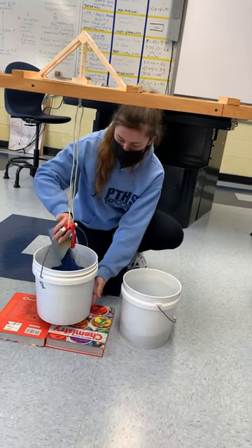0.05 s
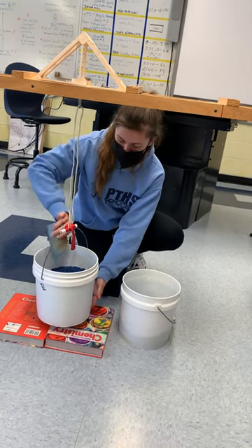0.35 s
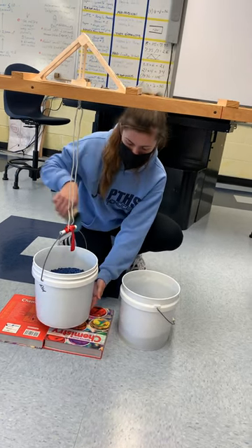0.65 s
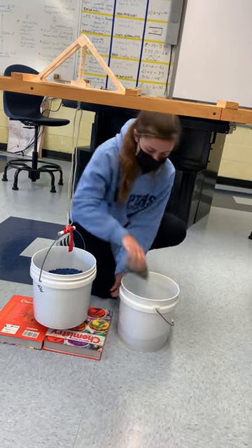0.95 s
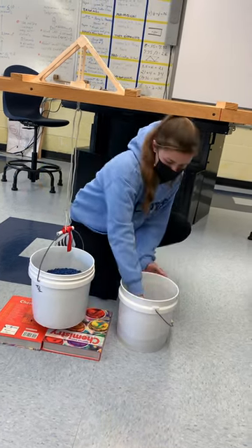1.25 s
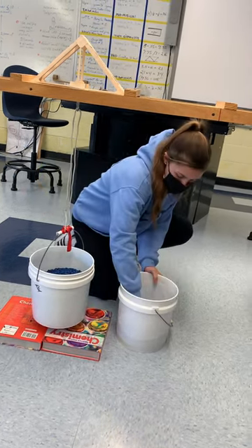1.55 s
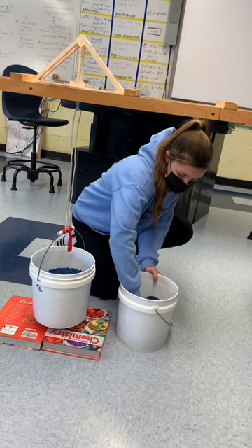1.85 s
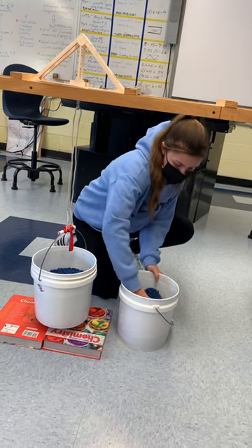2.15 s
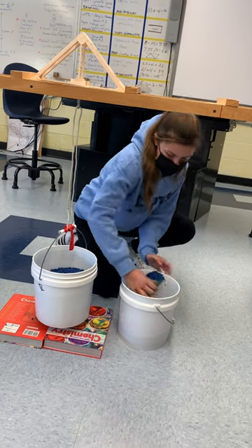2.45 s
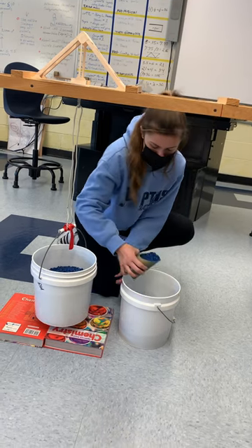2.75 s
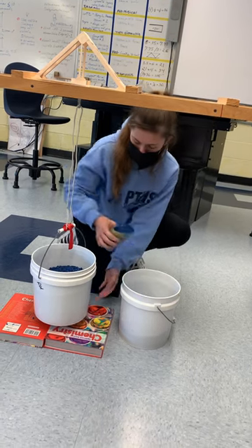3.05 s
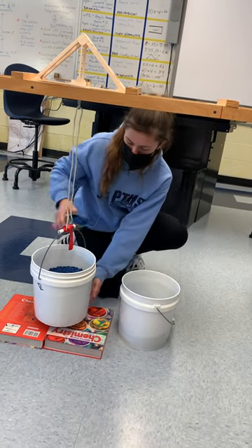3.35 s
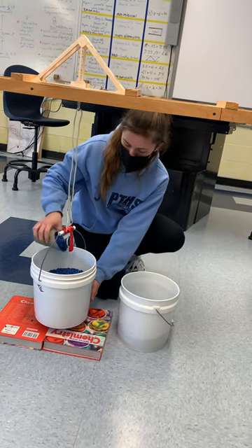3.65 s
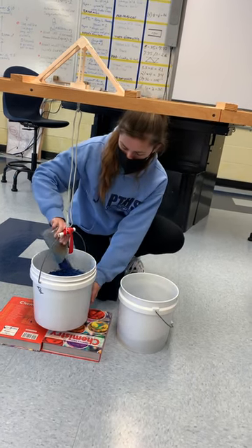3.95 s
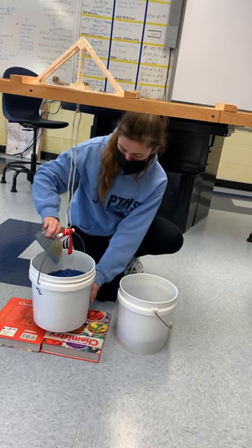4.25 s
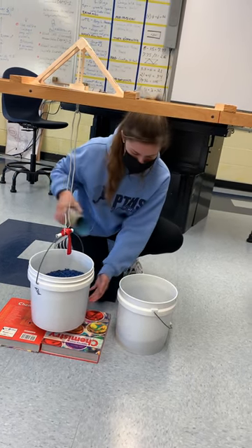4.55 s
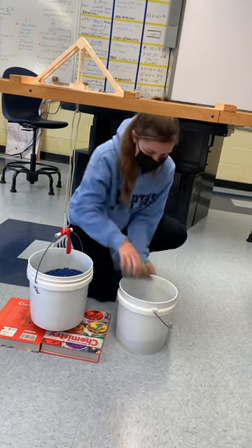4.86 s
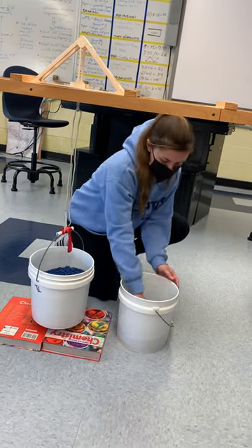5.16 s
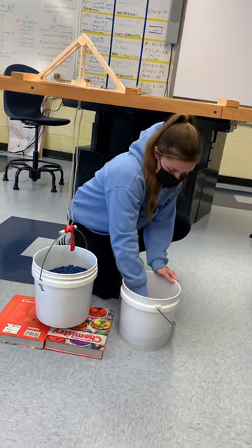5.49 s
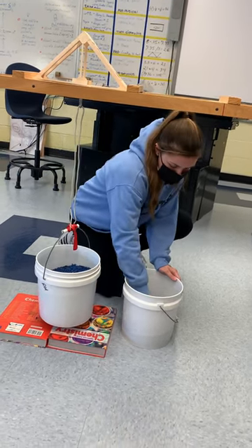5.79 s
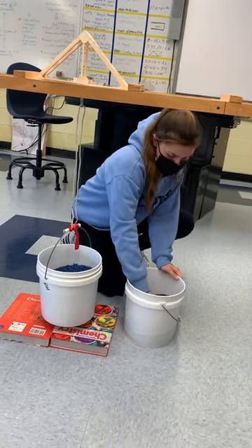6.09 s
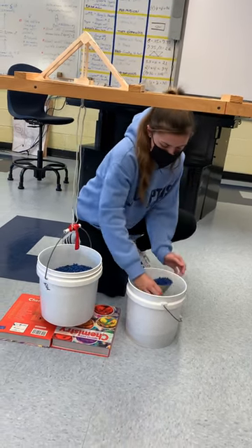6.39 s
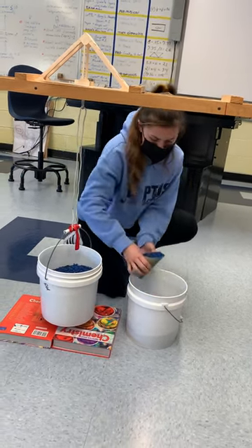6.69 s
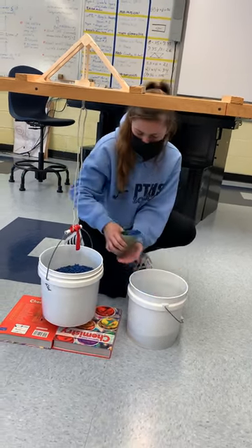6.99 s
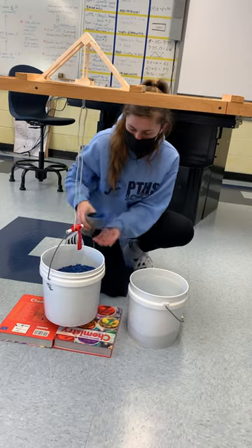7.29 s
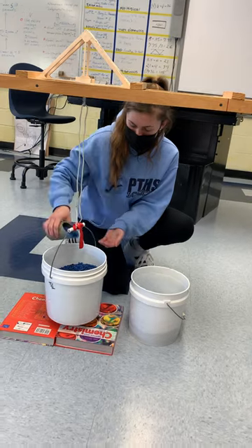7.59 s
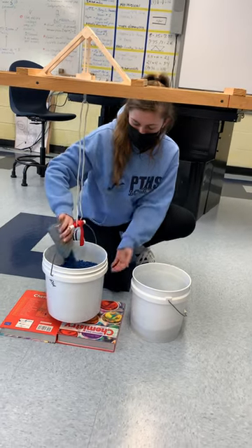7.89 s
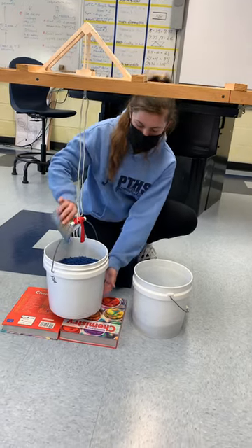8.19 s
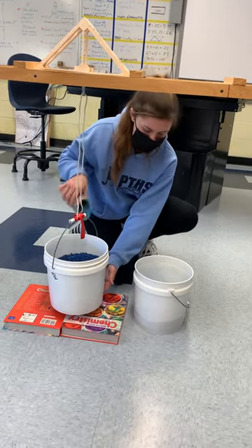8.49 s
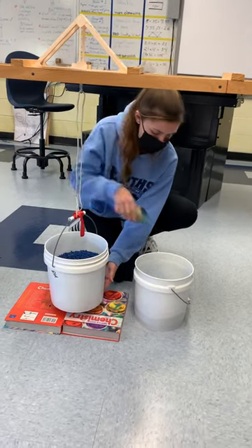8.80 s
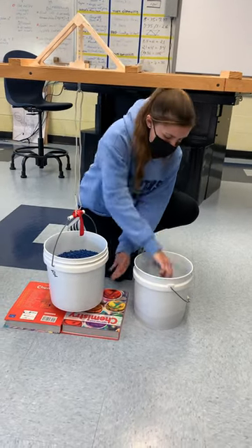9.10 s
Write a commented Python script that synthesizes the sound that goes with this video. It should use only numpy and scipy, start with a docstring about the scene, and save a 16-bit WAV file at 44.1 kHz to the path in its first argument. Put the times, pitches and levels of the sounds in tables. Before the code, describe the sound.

In a classroom with softly rumbling ventilation, a cup moves small plastic pellets from one plastic bucket to another, a couple of metres from the microphone. Three short rattling pours come about four seconds apart, the first right at the start. Between them the cup crunches into the pellets, judders against the hollow bucket wall and gives a few sharp taps as loose pellets drop. The room adds a short echo.

```python
"""Scooping and pouring plastic pellets

In a classroom, a cup moves pellets from one plastic bucket to another. It digs in with a crunch that
drums the bucket floor, judders along the wall, drops a few strays, then empties in a rattling rush
of tiny collisions. Ventilation rumbles underneath."""
import sys
import numpy as np
from scipy import signal
from scipy.fft import rfft, irfft, next_fast_len
from scipy.io import wavfile
from scipy.ndimage import uniform_filter1d

SR = 44100
rng = np.random.default_rng(int(sys.argv[2]) if len(sys.argv) > 2 else 0)


def master_out(mix):
    """Clip the mix to full scale and print it as 16-bit PCM to the path in sys.argv[1]."""
    frames = np.transpose(np.atleast_2d(mix))
    ceiling = np.clip(frames, -1, 1)
    pcm = np.round(ceiling * 32767).astype(np.int16)
    wavfile.write(sys.argv[1], SR, pcm)


N = 407484
TIME = np.arange(N) / SR

# Levels in the tables are relative: each sound gets its overall volume later.
# Cupfuls drop on the heap, whose air space shrinks each time.
# Each row: start, rise and hold in seconds, level and treble in dB, lowest rattle in Hz.
POURS = [(-0.1, .12, .19, -36, -36, 1060), (3.855, 0.095, 0.053, -30.5, -30, 1100),
         (7.847, 0.15, 0.11, -35.5, -36, 1480)]
# Pellets stuck together land as one. Each row: start in seconds, level in dB.
CLUMPS = [(.006, -38), (0.077, -33), (.12, -34), (0.169, -32.5), (0.212, -33.5), (.325, -46.5),
          (3.905, -38), (3.951, -31.5), (4.059, -34), (4.119, -41), (7.915, -43.5), (7.975, -40.5),
          (8.015, -36.5), (8.071, -32), (8.102, -33.5)]
# The cup digs in; the last row is the cup set down on the floor. Each row: start, rise and hold in seconds,
# crunch, treble and floor drumming in dB.
SHOVES = [(1.141, 0.0097, 0.045, -54, -55.5, -48.5), (1.164, 0.063, 0.035, -45.5, -46.5, -44),
          (1.315, 0.065, 0.058, -44, -49, -41.5), (1.49, .03, 0.24, -59.5, -75, -51.5),
          (1.599, 0.12, 0.007, -36, -40.5, -45.5), (5.073, 0.013, 0.053, -56, -55.5, -50.5),
          (5.159, 0.055, 0.034, -51.5, -56, -53.5), (5.227, 0.11, 0.13, -50.5, -53.5, -45.5),
          (5.458, 0.054, 0.17, -51.5, -56.5, -52), (5.643, 0.084, 0.018, -43.5, -46, -56),
          (9.223, 0.0086, .03, -52.5, -74, -48)]
# The cup sweeps up the wall. Each row: start, rise and hold in seconds, crunch, treble and drag in dB.
SWEEPS = [(1.645, 0.26, 0.32, -39.5, -45, -36.5), (5.706, .29, .19, -37.5, -43, -35)]
# Loose pellets shift or spill. Each row: start and length in seconds, crunch and treble in dB.
SHIFTS = [(2.366, 0.026, -43.5, -48), (2.48, 0.0067, -50.5, -60), (2.532, 0.015, -58, -66),
          (2.595, 0.073, -61.5, -68), (2.702, 0.0117, -55.5, -59), (3.316, .04, -72, -84),
          (3.364, 0.074, -62.5, -74.5), (3.568, .03, -72, -61), (4.946, 0.0095, -61.5, -79),
          (6.285, 0.013, -42.5, -47), (6.447, 0.043, -52.5, -59), (6.51, 0.12, -60.5, -66),
          (6.68, 0.093, -72.5, -67.5), (6.776, 0.16, -67, -82.5), (7.141, 0.04, -71, -78),
          (7.244, 0.081, -65, -70.5), (7.318, .17, -68.5, -76)]
# The cup sticks and slips on the wall. Each row: start in seconds, level in dB.
SLIPS = [(1.843, -29), (1.888, -25.5), (1.93, -29), (1.95, -26.5), (2.005, -37.5), (2.062, -34),
         (5.897, -35), (5.945, -24), (5.95, -24), (5.957, -24), (5.999, -24), (6.029, -23.5), (6.053, -37),
         (6.115, -25)]
# Cup taps and lone pellets. Each row: start in seconds, level, brightness and hollow ring in dB.
TAPS = [(0.342, -25, 3, -70), (1.1526, -63, -18, -47), (1.729, -19.5, -15.5, -62),
        (2.3564, -27, -22.5, -60), (2.3978, -21.5, -12, -57), (2.4314, -37, -22, -43), (2.5, -35, -5, -62),
        (2.539, -39, -27, -40.5), (2.564, -31.5, -21, -45), (2.71, -33.5, -12, -68),
        (2.994, -45.5, -36.5, -65), (3.031, -51.5, -19, -77), (3.3755, -38, -36, -46.5),
        (3.404, -37.5, -19, -60.5), (3.4491, -11.5, -1, -68), (3.5577, -32, 7, -75),
        (3.5903, -17.5, -8.5, -46.5), (3.609, -28.5, -15, -65), (3.736, -34.5, -8.5, -49),
        (3.8924, -14, -7, -60), (4.1235, -24.5, -45, -66), (4.229, -31, -27.5, -63), (5.086, -45, -7, -62),
        (6.2915, -25.5, -14, -62), (6.3011, -23, 0.5, -70), (6.348, -24, -18, -62), (6.44, -32, -15, -63),
        (6.4555, -30.5, -25, -44), (6.542, -33.5, -19, -43.5), (6.6883, -39, 3, -53),
        (6.7325, -39, -18, -51), (6.9645, -46, -42, -49), (7.1694, -44.5, -26, -55),
        (7.2668, -35.5, -13, -48.5), (8.2248, -35, -14, -71), (8.2691, -33, -3, -72),
        (8.429, -46, -17, -68.5), (9.229, -47, -32, -64)]
# The tone of pouring, scooping, taps and moving air. Each row: frequency in Hz, level in dB.
POUR_COLOUR = [(250, -15.5), (450, -21.5), (700, -23), (1000, -8.5), (1400, -2), (2000, -2.5), (3100, 0),
               (4400, -7), (5600, -12), (7500, -8), (10500, -7), (15000, -12.5)]
SCOOP_COLOUR = [(250, -10.5), (500, -10.5), (800, 2.5), (1300, 0.5), (1800, 6), (3000, 1.5), (4400, -1.5),
                (6500, -7.5), (8300, -4), (11000, -7.5), (15000, -11.5)]
TAP_COLOUR = [(300, -41), (800, -22.5), (1800, -3), (3300, -4), (5000, -11), (7500, -4), (10500, -0.5),
              (15000, -7.5)]
VENT_COLOUR = [(24, -46.5), (35, -16), (55, 0.5), (90, -4), (140, -0.5), (240, -4), (420, -16),
               (950, -22.5), (1500, -30.5), (3000, -40), (6500, -46.5), (11000, -40), (15000, -47.5)]
# Modes are the pitches at which a thing rings: the air above the heap, the cup, a bucket's floor
# and its wall. Each row: pitch in Hz, width in Hz (wider dies sooner), level in dB.
AIR_MODES = [(1350, 140, -3.5), (1970, 140, 2), (2330, 260, -4.5), (2510, 80, -5), (3060, 80, -6.5),
             (3332, 70, -6), (4100, 130, -5.5)]
CUP_MODES = [(554, 40, -12.5), (670, 65, -1.5), (792, 80, -3.5)]
FLOOR_MODES = [(320, 76, 20), (385, 35, -7)]
WALL_MODES = [(750, 96, -11), (837, 97, 6.5), (1002, 51, -2), (1160, 70, -8.5)]
# Mains hum and fan tone. Each row: pitch in Hz, level in dB.
VENT_TONES = [(120, -66.5), (595, -79.5)]
# The room's echo. Each row: frequency in Hz, seconds to fade by 60 dB.
ROOM_DECAY = [(200, 0.6), (2000, 0.42), (6000, 0.42), (14000, 0.44)]
# Stereo width. Each row: frequency in Hz, level of the side signal against the middle in dB.
STEREO_WIDTH = [(100, -14), (550, 2), (1000, -1.5), (2000, -1), (4500, 4.5), (7000, -0.5), (9000, -13),
                (15000, -8.5)]
# The left microphone against the right. Each row: frequency in Hz, level in dB.
LEFT_BALANCE = [(150, -2.0), (2000, 0.0), (5300, -3.0), (8000, -0.2)]
# How far the left microphone trails. Each row: frequency in Hz, phase lag in radians.
LEFT_LAG = [(0, 0), (1500, .5), (4000, 0), (6200, .1), (16000, 4 * np.pi)]


def pouring():
    """A trickle, then a cupful in clumps: the collisions rattle and also shake cup and bucket floor."""
    starts, _, _, levels_db, trebles_db, lowest_hz = np.transpose(POURS)
    # each stream thins out, then dies faster as the cup runs empty
    streams = [stroke(s, rise, hold, fall_db_per_s=114) * fade(s + rise + hold + 0.15, db_per_s=190)
               for s, rise, hold, *_ in POURS]
    trickle = sum(swell(s - 0.044, rise_db_per_s=380.5, fall_db_per_s=0) * fade(s, 114) for s in starts)
    clump_shapes = [stroke(s, rise_s=0.0066, hold_s=.008, fall_db_per_s=349.5) for s, _ in CLUMPS]
    clumps = together(clump_shapes, [db for _, db in CLUMPS])
    landing = together(streams + [trickle, clumps], [*levels_db, -51, 0])
    flow = together(streams + [trickle, clumps], [*trebles_db, -45, -5])
    hits_per_s = 500 + 3500 * (flow / flow.max()) ** .75
    clicks = collisions(hits_per_s, spread_db=1.5, even_s=0.0099, clump_db=1.6, clump_s=.007)
    # rolling in the tipped cup is loudest soon after the drop begins
    rolling = sum(swell(s + .07, rise_db_per_s=86, fall_db_per_s=71) for s in starts)
    cup = hollow_ring(CUP_MODES, keep_hz=(420, 1000), level_hz=(500, 900))
    hollow = from_db(-48.5) * convolve(clicks * rolling, cup)
    thud = from_db(-31.5) * convolve(clicks * landing, bucket_floor())
    grains = pellets(clicks, ring_s=0.0011, scatter_db=-9.5, ping_db=-5.5, ping_s=0.028)
    # each cupful has less low rattle than the one before
    cupful = np.searchsorted((starts[:-1] + starts[1:]) / 2, TIME)
    grains = sum(cut(grains * (cupful == k) + 1e-18, hz, "high", order=3)
                 for k, hz in enumerate(lowest_hz))
    click = impact(POUR_COLOUR)
    click_in_bucket = click + from_db(2.0) * resonate(click, AIR_MODES)
    return hollow + thud + from_db(-1.5) * rattle(grains, landing, flow, click_in_bucket)


def scooping():
    """Pellets grind past each other as the cup digs in, sweeps up and is carried off."""
    moves = shoves() + [stroke(s, rise, hold, fall_db_per_s=82) for s, rise, hold, *_ in SWEEPS]
    moves += [stroke(s, rise_s=0.004, hold_s=length, fall_db_per_s=250) for s, length, *_ in SHIFTS]
    levels = [row[3:5] for row in [*SHOVES, *SWEEPS]] + [row[2:] for row in SHIFTS]
    crunch_db, treble_db = np.transpose(levels)
    speed, surface = together(moves, crunch_db), together(moves, treble_db)
    hits_per_s = 280 + 2600 * (speed / speed.max()) ** .7
    clicks = collisions(hits_per_s, spread_db=2.0, even_s=0.021, clump_db=1.1, clump_s=0.0091)
    grains = pellets(clicks, ring_s=.0025, scatter_db=-8, ping_db=-4.5, ping_s=0.038)
    return from_db(-2.0) * rattle(grains, speed, surface, impact(SCOOP_COLOUR))


def shoves():
    """How each push of the cup into the pellets, and its final set-down, grows and fades."""
    return [stroke(s, rise, hold, fall_db_per_s=139) for s, rise, hold, *_ in SHOVES]


def supply_bucket():
    """Uneven shoves drum the bucket floor; the cup sticks and slips on the wall; taps ring hollow."""
    wall = hollow_ring(WALL_MODES, keep_hz=(620, 1300), level_hz=(700, 1100))
    # the drag peaks as the sweep reaches full speed
    drags = [swell(s + rise, rise_db_per_s=111.5, fall_db_per_s=90) for s, rise, *_ in SWEEPS]
    drag = together(drags, [row[-1] for row in SWEEPS])
    dig = together(shoves(), [row[-1] for row in SHOVES])
    # floor and wall are one shell: each shakes the other
    on_floor, on_wall = together([dig, drag], [0, -20.5]), together([drag, dig], [0, -0.5])
    floor_hits = collisions(200, spread_db=0.5, even_s=0.054, clump_db=1.5, clump_s=0.011)
    wall_hits = collisions(260, spread_db=1.5, even_s=0.022, clump_db=3.5, clump_s=0.02)
    drumming = from_db(0.2) * convolve(floor_hits * on_floor, bucket_floor())
    dragging = from_db(-5) * convolve(wall_hits * on_wall, wall)
    knocks = np.zeros(N)
    for s, *_, db in [*SLIPS, *TAPS]:
        knocks[int(s * SR)] = from_db(db)
    return drumming + dragging + from_db(1.5) * convolve(knocks, wall / np.abs(wall).max())


def strays_and_taps():
    """Lone pellets and cup taps: a bright crack over a lower plastic ring."""
    out, click, t = np.zeros(2 * N), impact(TAP_COLOUR), TIME[:2048]
    bodies = contacts(len(TAPS), ring_s=0.024, scatter_db=-14.0, scatter_s=0.075, size=len(t))
    cracks = contacts(len(TAPS), ring_s=0.0031, scatter_db=-9.0, scatter_s=0.064, size=len(t))
    for (s, db, bright_db, _), body, crack in zip(TAPS, bodies, cracks):
        rise_s = 0.00055 * from_db(-bright_db / 2)  # a duller touch starts more softly
        body = unit_energy(body * (1 - np.exp(-t / rise_s)))
        low = cut(body, 6500, "low", order=3)
        high = from_db(bright_db + 11.0) * cut(crack, 6300, "high", order=3)
        tap, at = convolve(low + high, click), int(s * SR)
        out[at:at + len(tap)] += from_db(db + 14.0) * unit_energy(tap)
    return out[:N]


def collisions(per_s, spread_db, even_s, clump_db, clump_s):
    """Random clicks of unequal size, evened out in loudness, then bunched into small avalanches."""
    sizes = from_db(spread_db * np.minimum(rng.exponential(1, N), 4)) * rng.choice([-1, 1], N)
    clicks = sizes * (rng.random(N) < per_s / SR)
    window = int(even_s * SR)
    power = uniform_filter1d(uniform_filter1d(clicks ** 2, window), window)
    even_clicks = clicks / np.sqrt(np.maximum(power, 1 / window))
    surges = from_db(clump_db * np.interp(TIME / clump_s, np.arange(N), rng.standard_normal(N)))
    return even_clicks * surges / np.sqrt(np.mean(surges ** 2))


def pellets(clicks, ring_s, scatter_db, ping_db, ping_s, count=400, size=768):
    """Each collision is a crack plus a short ping, pitched by the pellet and the gap around it."""
    cracks = contacts(count, ring_s, scatter_db, scatter_s=0.081, size=size)
    t, pitch_hz = TIME[:size], np.geomspace(1400, 14000, count)[:, None]
    pings = unit_energy(np.sin(2 * np.pi * pitch_hz * t) * from_db(-60 * t / ping_s))
    # high pings lie further apart in pitch, so each is made stronger
    pings *= np.sqrt(pitch_hz / pitch_hz.mean())
    kinds = (cracks + from_db(ping_db) * pings) / np.hypot(1, from_db(ping_db))
    picks, at = rng.integers(0, count, N), np.flatnonzero(clicks)
    sounds = clicks[at, None] * kinds[picks[at]]
    positions = at[:, None] + np.arange(size)
    return np.bincount(positions.ravel(), sounds.ravel(), N)[:N]  # add up overlapping sounds


def contacts(count, ring_s, scatter_db, scatter_s, size):
    """Brief cracks of pellets, each followed by its scatter between the bucket walls."""
    t = TIME[:size]
    decay = from_db(-60 * t / ring_s) + from_db(scatter_db - 60 * t / scatter_s)
    return unit_energy(rng.standard_normal((count, size)) * decay)


def rattle(grains, body_gain, treble_gain, click, split_hz=6500):
    """Pellets sound dull from inside the heap and bright from its moving surface."""
    body = unit_in_band(cut(click, split_hz, "low", order=3), 1500, 4000)
    treble = unit_in_band(cut(click, split_hz, "high", order=3), 9800, 12000)
    return convolve(grains * body_gain, body) + convolve(grains * treble_gain, treble)


def bucket_floor():
    """The dull ring of a bucket's floor under its load of pellets."""
    return hollow_ring(FLOOR_MODES, keep_hz=(250, 500), level_hz=(250, 480))


def hollow_ring(modes, keep_hz, level_hz):
    """Plastic rings after one knock; one band of the ring is kept, and another sets its level."""
    ring = resonate(signal.unit_impulse(4096), modes)
    return unit_in_band(cut(ring, keep_hz, "band"), *level_hz)


def classroom(x, tail_db, early_db, early_s, treble_db, size=32768):
    """Quick echoes from floor and furniture, then a tail that lasts longest in the bass."""
    t, hz = TIME[:size], np.fft.rfftfreq(size, 1 / SR)
    softening = from_db(at_hz([(4000, 0.0077), (10000, treble_db)], hz))
    noise = rfft(rng.standard_normal((2, size))) * softening
    early = from_db(early_db) * unit_energy(from_db(-60 * t / early_s))
    edges_hz, echo = np.geomspace(80, 20480, 9), 0
    for low, high in zip(edges_hz, edges_hz[1:]):
        decay_s = at_hz(ROOM_DECAY, np.sqrt(low * high))
        tail = from_db(tail_db) * unit_energy(from_db(-60 * t / decay_s))
        band = irfft(noise * (hz >= low) * (hz < high))
        echo += band * (early + tail) * (t > .003)
    return np.array([convolve(x, ear) for ear in diffuse(*echo)])


def ventilation():
    """Steady air rumble with mains hum and a faint fan tone."""
    colour = unit_in_band(impact(VENT_COLOUR, size=16384), 40, 400)
    noises = rng.standard_normal((2, N + len(colour) - 1))
    air = [signal.fftconvolve(noise, colour, "valid") for noise in noises]
    hum = sum(from_db(db) * np.sqrt(2) * np.sin(2 * np.pi * hz * TIME) for hz, db in VENT_TONES)
    return from_db(-58.64) * diffuse(*air) + hum


def diffuse(mid, side):
    """Left and right of a sound that comes from all around."""
    size = next_fast_len(len(side), True)
    width = from_db(at_hz(STEREO_WIDTH, np.fft.rfftfreq(size, 1 / SR)))
    side = irfft(rfft(side, size) * width, size)[:len(mid)]
    return np.array([mid + side, mid - side])


def stroke(s, rise_s, hold_s, fall_db_per_s):
    """The volume of one movement: it builds up, holds, then dies away."""
    rise = np.clip((TIME - s) / rise_s, 0, 1)
    return np.sin(rise * np.pi / 2) ** 2 * fade(s + rise_s + hold_s, fall_db_per_s)


def fade(s, db_per_s):
    """Full volume until second s, falling steadily after it."""
    return from_db(-db_per_s * np.maximum(TIME - s, 0))


def swell(s, rise_db_per_s, fall_db_per_s):
    """A volume that climbs to 1 at second s and falls again."""
    return from_db(-rise_db_per_s * np.maximum(s - TIME, 0)) * fade(s, fall_db_per_s)


def together(shapes, levels_db):
    """Overlapping movements add in power."""
    return np.sqrt(sum((from_db(db) * shape) ** 2 for shape, db in zip(shapes, levels_db)))


def impact(colour, size=4096):
    """The shortest click with a given tone colour."""
    spectrum = from_db(at_hz(colour, np.fft.rfftfreq(size, 1 / SR)))
    cepstrum = irfft(np.log(spectrum))
    # folding the second half onto the first packs the energy at the start
    cepstrum[1:size // 2] *= 2
    cepstrum[size // 2 + 1:] = 0
    return irfft(np.exp(rfft(cepstrum)))


def resonate(x, modes):
    """Let a sound ring at each mode, and add up the rings."""
    out = 0
    for hz, width, db in modes:
        r = np.exp(-np.pi * width / SR)
        feed = np.array([1, 0, -1]) * (1 - r * r) / 2
        feedback = [1, -2 * r * np.cos(2 * np.pi * hz / SR), r * r]
        out += from_db(db) * signal.lfilter(feed, feedback, x)
    return out


def unit_in_band(response, low_hz, high_hz):
    """Scale a response so that white noise of level 1 comes out at level 1 in a band."""
    return response / np.linalg.norm(cut(response, [low_hz, high_hz], "band", order=4))


def unit_energy(x):
    """Scale each sound to a total energy of 1."""
    return x / np.linalg.norm(x, axis=-1, keepdims=True)


def cut(x, hz, kind, order=2):
    """Keep the lows, the highs or one band of a sound."""
    return signal.sosfilt(signal.butter(order, hz, kind, fs=SR, output="sos"), x)


def convolve(x, response):
    """Give every sample of a sound the same ring or echo."""
    return signal.fftconvolve(x, response)[:N]


def at_hz(points, hz):
    """Read between the rows of a table, with octaves evenly spaced."""
    row_hz, value = np.transpose(points)
    return np.interp(np.log(np.maximum(hz, 1)), np.log(row_hz), value)


def from_db(db):
    """Turn decibels into a volume factor."""
    return 10 ** (np.asarray(db) / 20)


def scene():
    """The work goes on a couple of metres away; as hand and heap move, the echo paths change."""
    rush = pouring() + scooping() + supply_bucket()
    taps = strays_and_taps()
    shift = 2 * np.pi * 2.3 * TIME  # swings between two sets of echoes
    room = sum(classroom(rush * path, tail_db=-9.0, early_db=-3.5, early_s=0.042, treble_db=-2.0)
               for path in (np.cos(shift), np.sin(shift)))
    tap_room = classroom(taps, tail_db=-5, early_db=-7.0, early_s=0.056, treble_db=-8.5)
    return rush + taps + room + tap_room + ventilation()


def record(dry):
    """The left microphone is a little weaker and trails the right; the highest treble is cut."""
    size, cutoff_hz = next_fast_len(N + SR, True), 16100
    hz = np.fft.rfftfreq(size, 1 / SR)
    lag = np.interp(hz, *np.transpose(LEFT_LAG))
    left = from_db(at_hz(LEFT_BALANCE, hz) / 2) * np.exp(-.5j * lag)
    right = 1 / left
    heard = irfft(rfft(dry, size) * np.array([left, right]), size)[:, :N]
    return signal.sosfilt(signal.ellip(10, .1, 70, cutoff_hz, fs=SR, output="sos"), heard)


dry = scene()
out = record(dry)
master_out(out)
```